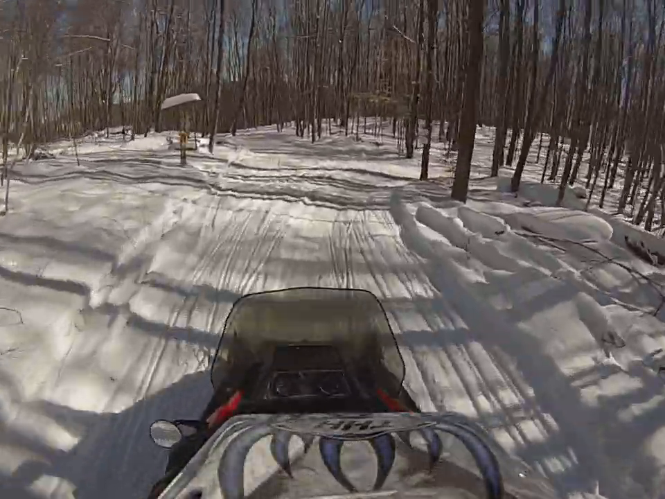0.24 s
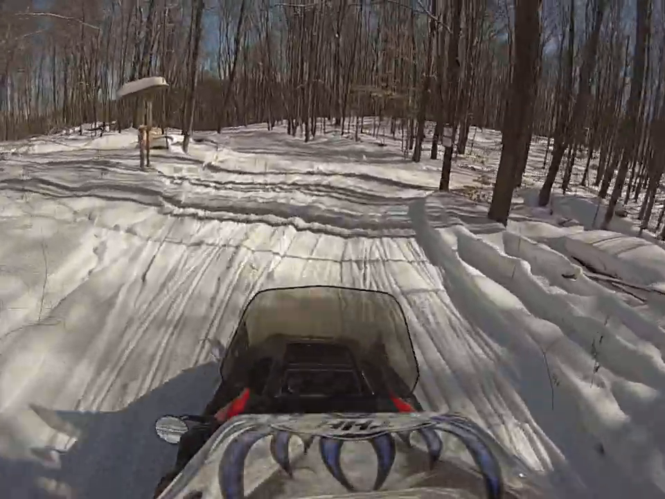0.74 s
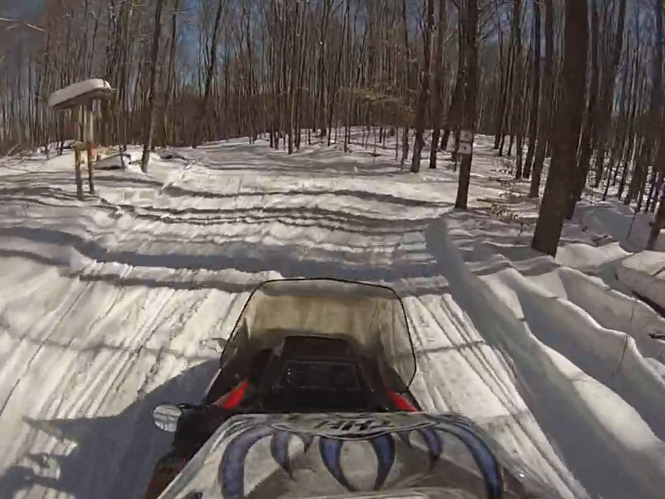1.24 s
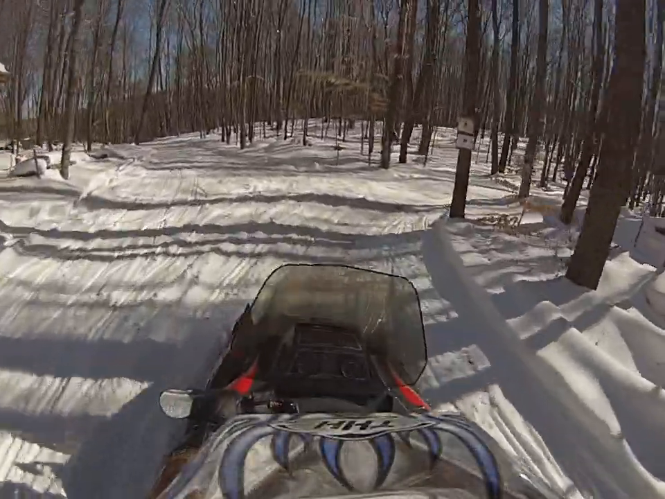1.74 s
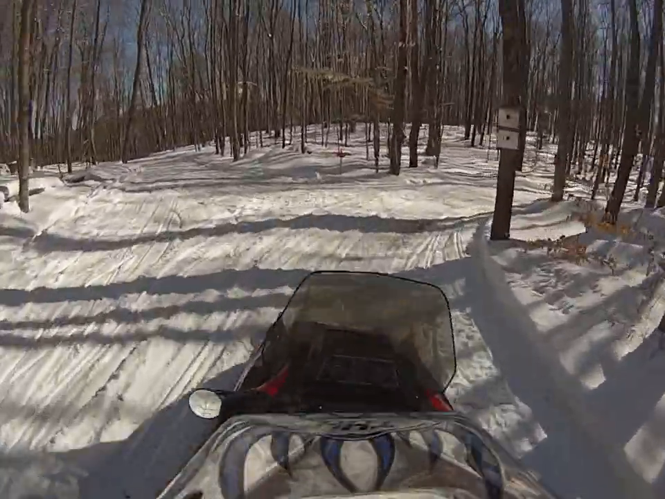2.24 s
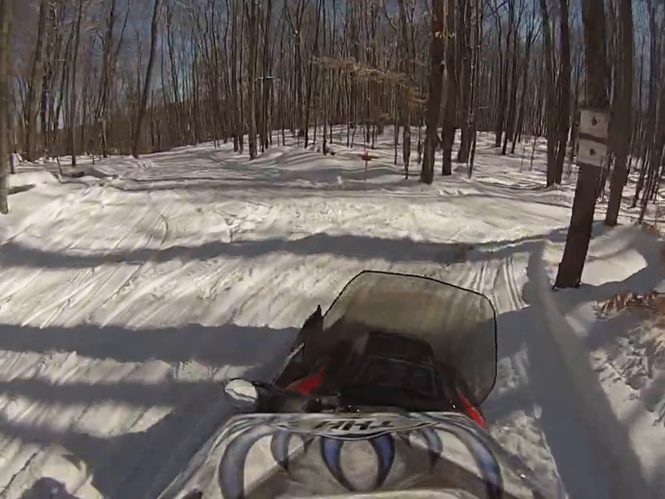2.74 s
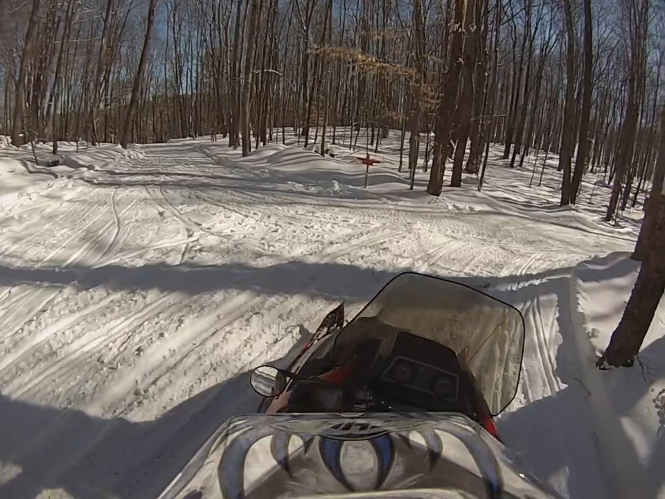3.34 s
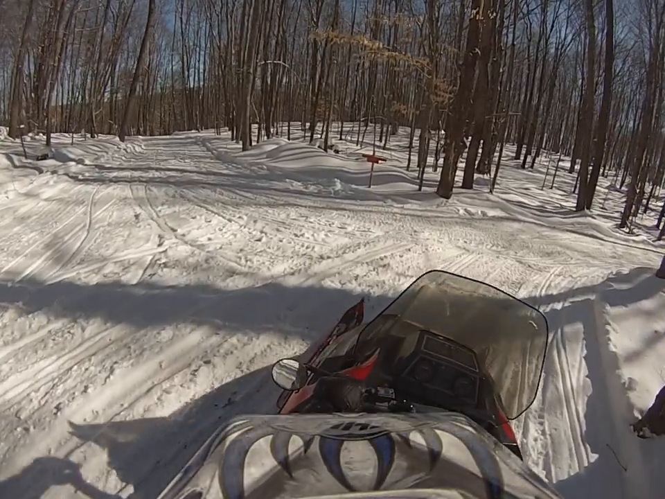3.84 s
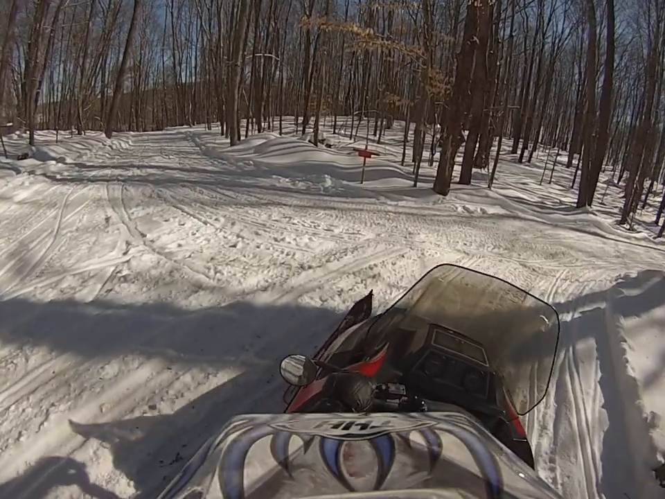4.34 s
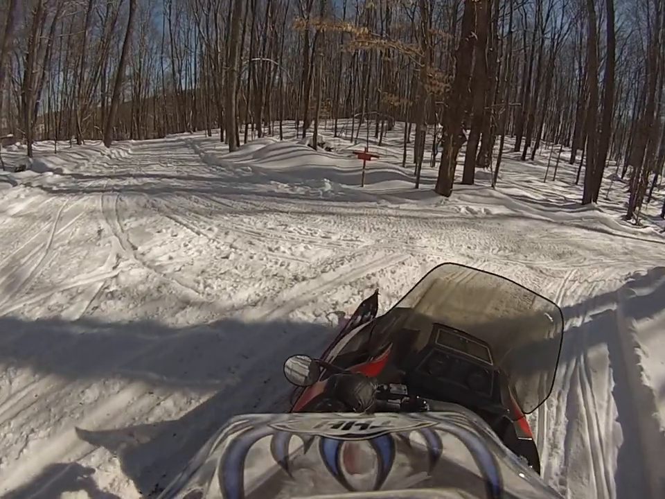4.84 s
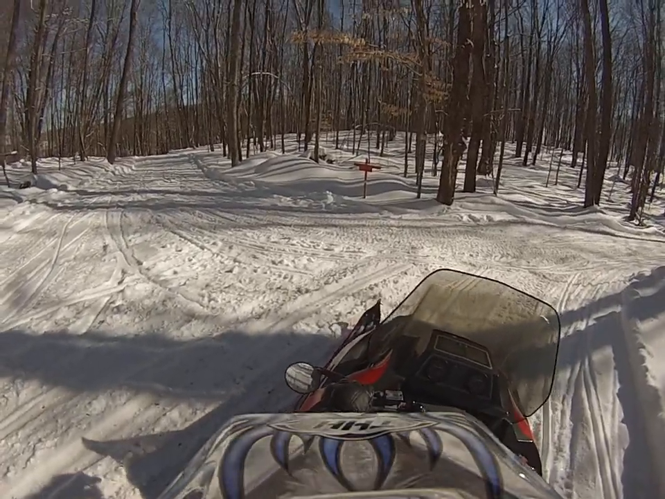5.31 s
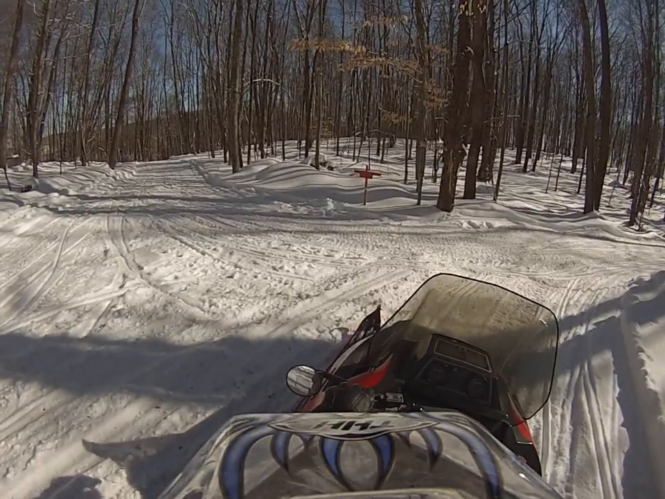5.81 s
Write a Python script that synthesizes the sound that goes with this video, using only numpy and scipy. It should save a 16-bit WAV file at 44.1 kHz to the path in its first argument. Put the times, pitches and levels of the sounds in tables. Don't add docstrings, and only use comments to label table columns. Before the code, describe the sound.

A two-stroke snowmobile coasts down a snowy trail, its buzzing drone sinking in pitch and rattling before it stops and settles into a lumpy, puttering idle.

```python
import sys
import numpy as np
from scipy import signal
from scipy.fft import rfft, irfft
from scipy.io import wavfile

SR = 44100
rng = np.random.default_rng(int(sys.argv[2]) if len(sys.argv) > 2 else 0)


def unload_audio(sound):
    columns = np.transpose(np.atleast_2d(sound))
    steps = np.round(np.clip(columns, -1, 1) * 32767)
    wavfile.write(sys.argv[1], SR, steps.astype(np.int16))


def gain_from_decibels(decibels):
    exponent = np.asarray(decibels, float) / 20
    return 10 ** exponent


N = 267687
T = np.arange(N) / SR

# time in seconds, turns a second in Hz.
CRANK_HZ = [(0.0, 57.55), (0.55, 56.05), (1.1, 52.73), (1.65, 50.18), (1.93, 48.82), (2.21, 46.67),
            (2.48, 44.84), (3.03, 41.72), (3.58, 39.03), (4.14, 37.59), (4.96, 34.55), (5.24, 31.76),
            (5.65, 29.5), (6.07, 28.1)]
# time in seconds, level in dB.
EFFORT_DB = [(0, -0.5), (.5, -0.5), (1.0, -2), (1.35, -1), (1.57, -3), (1.91, -1.5), (2.2, -3), (2.8, -3.5),
             (3.0, -4.5), (3.4, -5), (4.0, -6.5), (4.62, -7.5), (4.92, -9), (5.32, -8), (5.83, -8.5),
             (6.07, -8)]
# multiple of crank speed, level in dB, crest time in seconds, spread in seconds.
ORDER_SWELLS = [
    (1, -59.5, 4.5, 1.3),
    (1, -73, 0.82, .8),
    (4, -73, 1.86, 0.14),
    (4, -55, 5.6, 0.42),
    (4, -59, 4.6, 0.58),
    (6, -59, 2.1, 0.11),
]
# multiple of crank speed, level in dB, crest time in seconds, spread in seconds.
FAN_SWELLS = [(24, -62, 2.88, .22), (24, -75, 3.45, .25), (24, -68, .6, .25)]
# level in dB at full effort, slope in dB per dB of effort.
LAYERS = [
    (-35.5, 1.13),
    (-40.5, 0.93),
    (-63, 0.55),
    (-51.5, 0.92),
]
# centre in Hz, width in Hz, level in dB.
ROAR_MODES = [(972, 144, -21), (1970, 242, -5), (2212, 195, -4.5), (2391, 166, 2.5), (2538, 134, -1.5),
              (2717, 66, -9)]
# centre in Hz, width in Hz, level in dB.
CLATTER_MODES = [(3006, 210, -7.5), (3188, 88, -3), (3430, 196, -1), (3570, 106, -1.5), (3760, 310, -4.5),
                 (4270, 335, -4), (4520, 500, -7.5), (4960, 340, -12), (5300, 370, -12), (5740, 240, -12.5),
                 (6380, 370, -18), (7390, 190, -17.5)]
# frequency in Hz, level in dB per Hz.
HISS_SPECTRUM = [(3800, -12), (6500, -9.5), (7400, -33), (7900, -7.5), (8500, -8.5), (9300, -7), (9600, -9),
                 (9850, -14.5), (10200, -10), (10800, -12), (11300, -15), (12300, -11.5), (13200, -13),
                 (15500, -19)]
# centre in Hz, width in Hz, level in dB.
DRIVE_MODES = [(380, 120, -5.5), (1354, 24, 1), (3485, 230, 1.5), (4450, 180, -6), (4950, 110, -1),
               (6430, 410, -6.5), (6850, 1300, -15.5)]
# centre in Hz, width in Hz, level in dB.
CHUFF_MODES = [(3670, 91, -3), (4250, 300, -6), (7200, 400, -19), (9300, 600, -27)]
# centre in Hz, width in Hz, level in dB.
SLAP_MODES = [(3540, 250, 5.5), (4140, 460, 4), (4840, 520, -3), (6440, 180, -1.5), (8700, 1500, -27),
              (10600, 720, -32)]
# centre in Hz, width in Hz, level in dB.
TICK_MODES = [(5600, 900, -7), (7300, 400, -7), (9250, 700, -7), (12500, 3000, -19)]
# start in seconds, length in seconds, boom in dB, shudder from 0 to 1.
BUMPS = [(0.035, 0.022, -41, 0.26), (0.17, .018, -48, 0.25), (0.266, .023, -41, .3), (0.341, 0.031, -42, 0),
         (0.457, 0.017, -45, 0), (0.512, 0.032, -50, 0.24), (0.587, 0.038, -40, 0.2), (0.64, .04, -45, 0.2),
         (0.702, 0.031, -37.5, 0), (0.782, 0.045, -41, 0), (0.862, .025, -44, 0.24),
         (0.91, 0.018, -45, 0.34), (0.979, .025, -35.5, .2), (1.086, 0.037, -39, .15),
         (1.17, 0.012, -43, 0.2), (1.24, 0.022, -50, 0), (1.306, 0.021, -58, 0.2), (1.397, 0.021, -47, 0),
         (1.457, .02, -67, 0.4), (1.844, 0.014, -45, 0.2), (1.951, .014, -42, 0.65),
         (2.072, 0.019, -50, 0.06), (2.242, 0.011, -42, .4), (2.303, 0.012, -52, 0.2),
         (2.679, 0.018, -55, .3), (2.803, 0.025, -48, 0.1), (3.111, .02, -49, 0), (3.164, 0.051, -44.5, .7),
         (3.249, 0.039, -45, 0), (3.353, 0.037, -43, 0.1)]
# start in seconds, length in seconds, boom in dB, shudder from 0 to 1.
BEATS = [(3.492, 0.034, -43, 0.36), (3.589, .12, -44.5, 0.43), (3.733, 0.041, -44.5, 0.4),
         (3.836, 0.055, -44, 0.64), (3.977, 0.043, -40, 0.77), (4.082, 0.046, -38.5, 0.66),
         (4.183, 0.039, -39.5, 0.8), (3.413, 0.023, -61, .4), (4.297, 0.036, -36.5, 0.75),
         (4.433, 0.043, -39.5, 0.7), (4.559, 0.036, -37, 0.8), (4.633, 0.06, -42.5, 0.2),
         (4.701, 0.045, -36, 0.9), (4.777, 0.04, -36, 0.2), (4.853, 0.02, -37, 0.46),
         (4.953, 0.011, -57, 0.4), (5.038, .04, -44.5, 0), (5.089, .014, -40, 0.6),
         (5.198, 0.041, -43, 0.35), (5.27, 0.046, -41.5, 0.26), (5.327, 0.033, -41.5, 0.37),
         (5.405, .039, -38.5, .55), (5.455, 0.039, -39, 0.44), (5.533, 0.05, -40, 0.66),
         (5.629, 0.061, -42, 0.36), (5.72, 0.018, -38.5, 0.33), (5.766, 0.023, -41.5, 0.3),
         (5.812, 0.037, -41, 0), (5.896, 0.07, -40.5, .1), (6.004, 0.032, -40.5, 0.33)]
# time in seconds, frequency in Hz.
LEAN_HZ = [(0, 97), (1.4, 91), (2.0, 106), (2.8, 104), (3.8, 102.4), (4.2, 91.4), (4.7, 96), (5.4, 97.5),
           (6.0, 104.3)]
# time in seconds, frequency in Hz, level in dB.
LUGS = [(0.0, 294, -54), (0.4, 290, -54.5), (0.72, 274.2, -54), (1.3, 240.2, -67), (1.6, 215, -61),
        (1.75, 202.3, -53), (2.1, 183, -57), (2.45, 158, -58), (2.75, 136.3, -52.5), (3.1, 111.6, -64)]
# frequency in Hz, level in dB per Hz.
RUMBLE_SPECTRUM = [(8, -5.5), (14, 11), (25, -25), (55, -8.5), (100, 2), (150, -15.5), (250, -14),
                   (600, -17.5), (1200, -18), (3000, -18.5), (7000, -26), (12000, -77)]


def evened(x):
    return x / np.sqrt(np.mean(x ** 2) + 1e-20)


def columns(rows):
    s, *values = np.transpose(rows)
    return [np.interp(T, s, v) for v in values]


def coloured(x, points):
    hz, db = np.transpose(points)
    log_hz = np.log(np.fft.rfftfreq(N, 1 / SR) + 1)
    return irfft(rfft(x) * gain_from_decibels(np.interp(log_hz, np.log(hz + 1), db)), N)


def through(x, modes):
    hz = np.fft.rfftfreq(N, 1 / SR)
    power = sum(gain_from_decibels(2 * db) / (1 + (2 * (hz - mode_hz) / width_hz) ** 2) ** 2
                for mode_hz, width_hz, db in modes)
    return irfft(rfft(x) * np.sqrt(power), N)


def drift(top_hz):
    lowpass = signal.butter(2, top_hz, fs=SR, output="sos")
    return evened(signal.sosfilt(lowpass, rng.standard_normal(N)))


def grainy(share):
    height = gain_from_decibels(3.0 * np.minimum(rng.exponential(1, N), 4))
    ticks = height * (rng.random(N) < 900 / SR) * rng.choice([-1, 1], N)
    return rng.standard_normal(N) + share * evened(ticks)


def crest(rest, top, s, spread_s):
    return rest + top * np.exp(-.5 * ((T - s) / spread_s) ** 2)


def layer_db(index):
    db, slope = LAYERS[index]
    return db + slope * columns(EFFORT_DB)[0]


def firing_level_db(crank_hz):
    boom_hz, width_hz, boom_db, steepness, tilt_db_per_hz = 99.2, 7.0, -34.0, 1.2, -.2
    reach_hz, fade_s, fade_db_per_s = 18.0, 3.1, 8.0
    off_hz = np.maximum(2 * crank_hz - boom_hz, -reach_hz)
    resonance_db = -10 * steepness * np.log10(1 + (2 * off_hz / width_hz) ** 2)
    return boom_db + tilt_db_per_hz * off_hz + resonance_db - fade_db_per_s * np.maximum(T - fade_s, 0)


def orders(turns, firing_db):
    out = gain_from_decibels(firing_db + .4 * drift(14)) * np.cos(4 * np.pi * turns)
    for multiple, db, s, spread_s in ORDER_SWELLS + FAN_SWELLS:
        swell = gain_from_decibels(db + 1.5 * drift(8)) * crest(0, 1, s, spread_s)
        out += swell * np.cos(2 * np.pi * multiple * (turns + .002 * drift(30)))
    return np.sqrt(2) * out


def mount(turns):
    shake_db, lead_s = -52.5, .009
    out = gain_from_decibels(shake_db) * evened(through(rng.standard_normal(N), [(98, 16, 0), (150, 40, -12)]))
    t = np.arange(SR // 5) / SR
    rise = np.sin(np.pi / 2 * np.clip(t / 0.017, 0, 1)) ** 2
    overtone = 0.21 * np.exp(-t / 0.012) * np.sin(2 * np.pi * 155 * t)
    for s, length_s, db, _ in BUMPS + BEATS:
        hz = np.interp(s, *np.transpose(LEAN_HZ))
        shape = rise * np.exp(-np.maximum(t - length_s - .004, 0) / 0.016)
        start, middle_s = round((s - lead_s) * SR), length_s / 2 + lead_s
        firing = 4 * np.pi * turns[start + round(middle_s * SR)]
        ring = np.cos(2 * np.pi * hz * (t - middle_s) + firing)
        part = out[start:][:len(t)]
        part += (gain_from_decibels(db + 1.5) * shape * (ring + overtone))[:len(part)]
    return out


def shudders():
    lag_s, rise_s, fall_s = 0.013, 0.011, 0.014
    s, _, _, share = np.transpose(BUMPS + BEATS)
    t = np.arange(0, N / SR, 1 / 500)
    late_s = t[:, None] - s - lag_s
    swells = np.exp(-.5 * (late_s / np.where(late_s < 0, rise_s, fall_s)) ** 2) @ share
    return [np.interp(T, t, full_db * swells) for full_db in (5.0, 7, 7)]


def case_noise(swell_db):
    flutter = drift(58)
    roar_db = layer_db(0) - 0.5 + 0.96 * swell_db[0] + 0.56 * flutter + 0.41 * drift(5.8)
    clatter_db = layer_db(1) - 3.5 + swell_db[1] + 0.85 * flutter + 1.3 * drift(8.9)
    hiss_db = layer_db(2) + 1.0 + swell_db[2] + 1.3 * flutter + .4 * drift(11.0)
    out = gain_from_decibels(roar_db) * evened(through(grainy(0.2), ROAR_MODES))
    out += gain_from_decibels(clatter_db) * evened(through(grainy(0.46), CLATTER_MODES))
    return out + gain_from_decibels(hiss_db) * evened(coloured(grainy(0.26), HISS_SPECTRUM))


def transmission(clatter_swell_db):
    db = -50.5 - 2.8 * np.maximum(T - 1.5, 0) - 5 * np.maximum(T - 3.3, 0)
    return gain_from_decibels(db + clatter_swell_db + 1.8 * drift(27)) * evened(through(grainy(0.053), DRIVE_MODES))


def clutch():
    return np.clip((3.35 - T) / .12, .25, 1) * (T < 4.2)


def chuffs(clatter_swell_db):
    puffs = (gain_from_decibels(clatter_swell_db) - 1) * (1 - clutch())
    return gain_from_decibels(-50) * puffs * evened(through(grainy(.3), CHUFF_MODES))


def knocks(turns, modes):
    strength = gain_from_decibels(0.41 * rng.standard_normal(400))[turns.astype(int)]
    burst = np.exp(-(turns % 1) / .18) * rng.standard_normal(N)
    knock = np.diff(np.floor(turns), prepend=0)
    return evened(through(strength * (evened(burst) + .6 * evened(knock)), modes))


def piston_slap(turns):
    return gain_from_decibels(-37.5) * crest(.08, .29, 2.95, .42) * clutch() * knocks(turns + .13, SLAP_MODES)


def idle_tick(turns):
    idling = np.clip((T - 4.3) / .5, 0, 1)
    return gain_from_decibels(-55) * crest(.04, .21, 5.33, .45) * idling * knocks(turns + .8, TICK_MODES)


def lugs():
    hz, db = columns(LUGS)
    passes = np.cumsum(hz * (1 + .03 * drift(30))) / SR
    moving = np.clip((3.15 - T) / 0.13, 0, 1)
    return np.sqrt(2) * gain_from_decibels(db + 3.0 * drift(23)) * moving * np.sin(2 * np.pi * passes)


def panel():
    murmur_db, puff_db, lag_s = -63.5, -52, .006
    s, _, _, share = np.transpose(BEATS)
    t = np.arange(0, N / SR, 1 / 500)
    puffs = np.exp(-.5 * ((t[:, None] - s - lag_s) / 0.0071) ** 2) @ share * gain_from_decibels(puff_db)
    ring = evened(through(grainy(0.2), [(1550, 180, 0)]))
    return (gain_from_decibels(murmur_db + 2.0 * drift(26)) + np.interp(T, t, puffs)) * ring


def rumble():
    return gain_from_decibels(layer_db(3) + 7.0) * evened(coloured(rng.standard_normal(N), RUMBLE_SPECTRUM))


def scene():
    crank_hz = columns(CRANK_HZ)[0]
    turns = np.cumsum(crank_hz) / SR
    swell_db = shudders()
    out = orders(turns, firing_level_db(crank_hz)) + mount(turns)
    out += case_noise(swell_db) + transmission(swell_db[1]) + chuffs(swell_db[1])
    out += piston_slap(turns) + idle_tick(turns)
    out += lugs() + panel() + rumble()
    return out[None]


def band_limit(x):
    return signal.sosfilt(signal.butter(12, 15190, fs=SR, output="sos"), x)


def record(dry):
    return band_limit(dry)


dry = scene()
out = record(dry)
unload_audio(out)
```